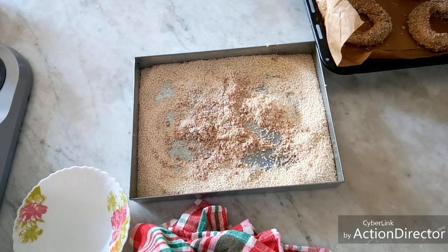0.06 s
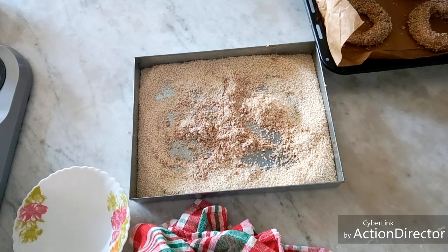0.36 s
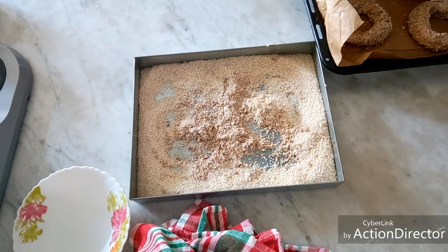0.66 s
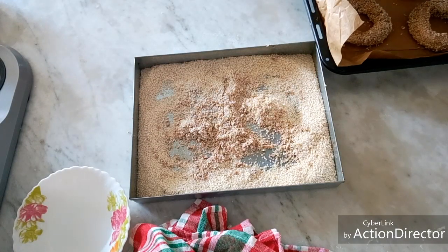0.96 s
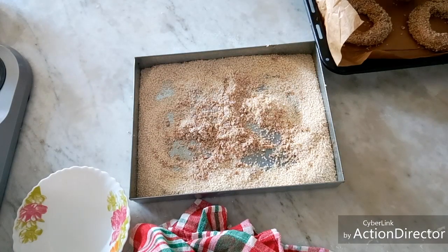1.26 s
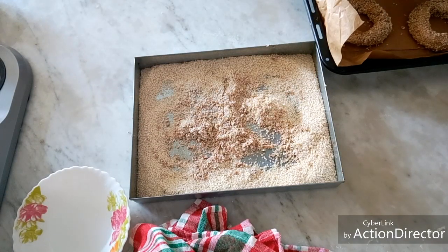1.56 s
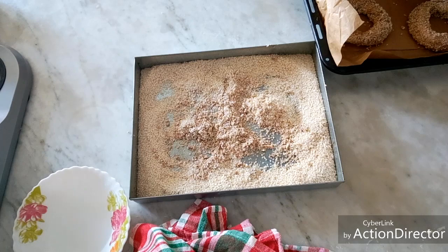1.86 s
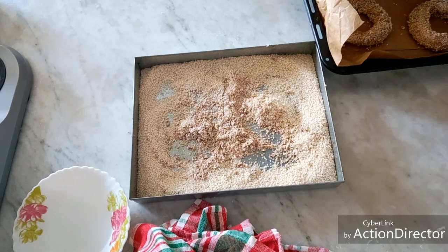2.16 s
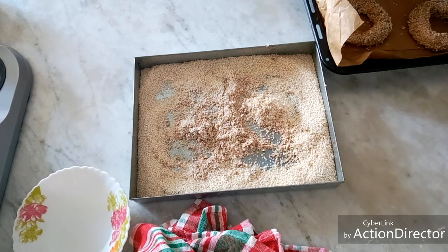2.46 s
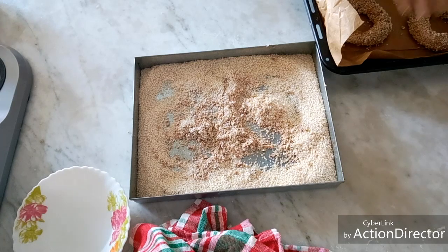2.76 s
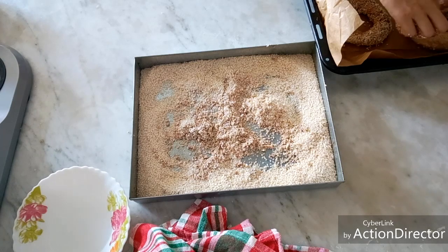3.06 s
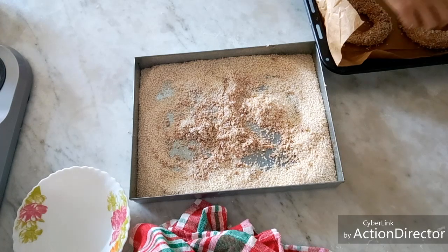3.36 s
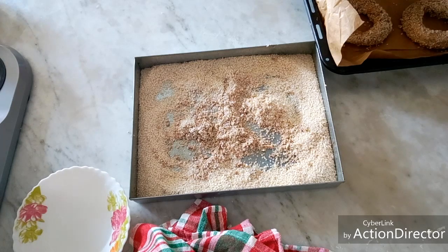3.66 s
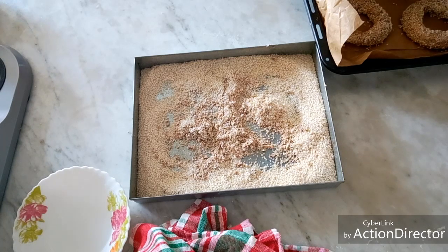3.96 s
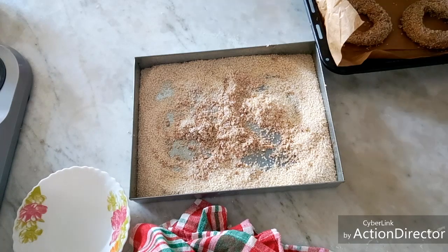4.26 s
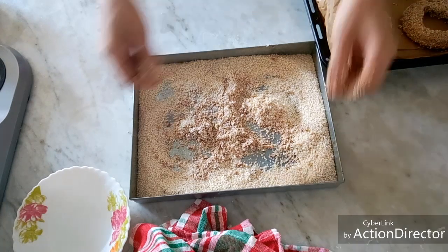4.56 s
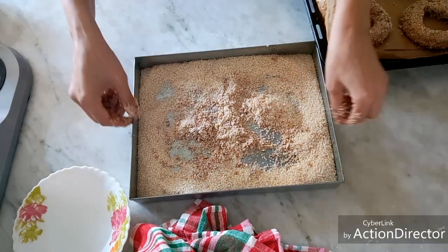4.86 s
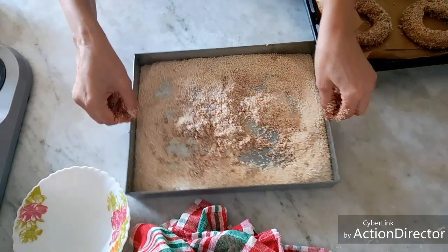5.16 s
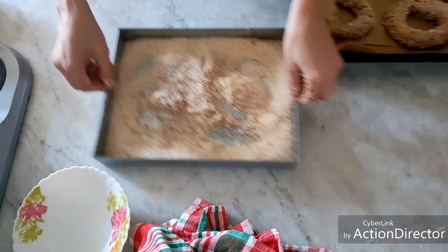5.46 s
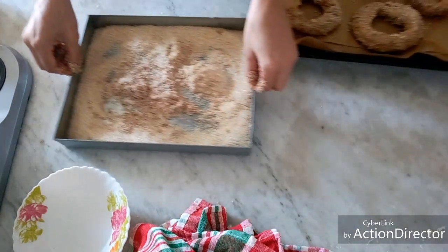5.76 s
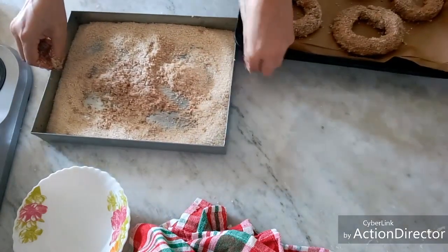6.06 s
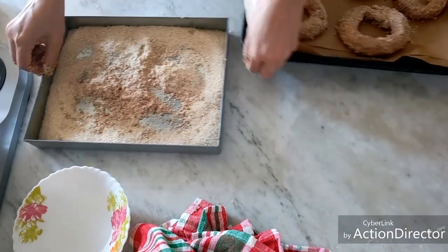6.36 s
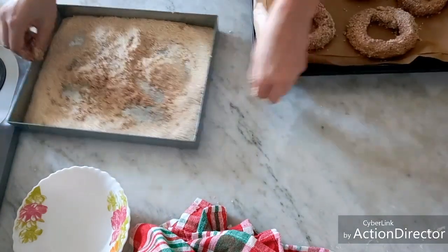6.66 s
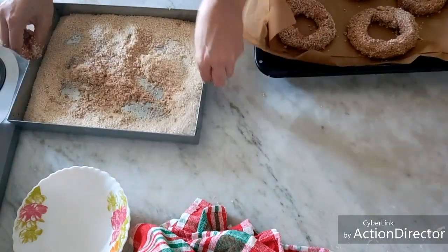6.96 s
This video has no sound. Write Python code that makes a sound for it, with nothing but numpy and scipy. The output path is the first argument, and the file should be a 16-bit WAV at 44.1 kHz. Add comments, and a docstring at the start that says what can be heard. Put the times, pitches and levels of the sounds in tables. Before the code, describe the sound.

Hands rustle baking paper with soft bumps of dough, before a tray of seeds slides grittily and a metal sheet clanks.

```python
"""Baking paper crinkles and snaps as hands settle a seed-coated dough ring on it, with soft rubs and bumps.
Then a metal tray of sesame seeds scrapes across a marble counter, grit ringing its walls. The paper
stirs again, and the baking sheet beside the tray, lightly nudged here and there, knocks down once, loudly.
A small hard kitchen rings after each sound, over room noise and a faint appliance hum."""
import sys
import numpy as np
from scipy import signal
from scipy.fft import rfft, irfft
from scipy.io import wavfile
from scipy.ndimage import uniform_filter1d

SR = 44100
rng = np.random.default_rng(int(sys.argv[2]) if len(sys.argv) > 2 else 0)


def transcribe(u):
    """Save the signal u as a 16-bit wav file named by the first command-line argument.

    u: samples, shape (n,) or (channels, n), limited to [-1, 1]; the rate is SR.
    q: integer samples, one column per channel.
    """
    v = np.clip(np.atleast_2d(u).T, -1, 1)
    q = np.round(v * 32767).astype(np.int16)
    wavfile.write(sys.argv[1], SR, q)


N = 317961
TIME = np.arange(N) / SR

# Tone of the room noise. Each row: frequency in Hz, gain in dB.
ROOM_TONE_EQ = [(20, -9), (45, -5), (80, 9), (190, 0), (300, 0), (600, -6.5), (1200, -10), (2500, -13.5),
                (6000, -16), (9000, -13), (13500, -11.5), (15500, -16.5)]
# The appliance hum. Each row: frequency in Hz, level in dB.
HUM_PARTIALS = [(72, -93.5), (186, -66.5)]
# Soft bumps of hands and dough, and low thumps as the tray starts to slide. Each row: start in seconds, level
# in dB, pitch in Hz, length in seconds.
SOFT_BUMPS = [(0.095, -49, 600, 0.012), (1.275, -48, 145.4, 0.031), (1.895, -58, 219, 0.033),
              (2.025, -54, 330, .025), (3.11, -48, 140, 0.036), (3.506, -51, 350, 0.039),
              (3.675, -49, 199, 0.025), (5.13, -71, 234, .09), (5.265, -50.5, 136.8, .08)]
# Blows on the baking sheet. Each row: start in seconds, level in dB, contact time in ms,
# frequency in Hz below which the sheet is held still.
SHEET_BLOWS = [(1.205, -59, 1.2, 1000), (1.343, -53, 1.2, 1000), (1.384, -55, 1.1, 1000),
               (3.118, -57.5, 0.29, 716), (3.153, -61, 0.92, 910), (5.155, -64, 1, 850),
               (6.32, -49, 0.37, 1110), (6.727, -48.5, 0.36, 1190), (6.8094, -24, 0.12, 130)]
# The baking sheet's modes. Each row: frequency in Hz, gain in dB, free 60 dB decay time in seconds.
SHEET_MODES = [(144, -20, 1), (198, -1, 0.37), (221, -9.5, 0.45), (252, -9.5, 0.43), (298, -17, 0.89),
               (323, -19, 1), (445, -10.5, 0.16), (474.4, -11, 0.21), (524, -17, 0.35), (593.3, -9.5, 0.17),
               (870, -16, 0.13), (1009, -8, 0.23), (1038, -12.5, .17), (1122, -13.5, 0.14),
               (1220, -7, 0.15), (1268, -11, 0.15), (1358, -23, 0.22), (2480, -14, 0.074), (2670, -16, 0.1),
               (3440, -12.5, 0.1), (3673, -4.5, 0.076), (4220, -8, 0.08), (4338, -1, 0.058),
               (4730, -11, 0.084), (4920, -10, 0.13), (6300, -18, 0.13)]
# Envelope of the tray's slide. Each row: time in seconds, scrape level in dB.
SLIDE_ENVELOPE = [(4.75, -85), (4.888, -66.5), (5.35, -64.5), (5.47, -53.5), (5.678, -49.5), (6.022, -48),
                  (6.038, -53.5), (6.092, -48.5), (6.22, -64)]
# Resonances of the tray's walls. Each row: frequency in Hz, width in Hz, gain in dB.
TRAY_MODES = [(1020, 78, 8.5), (1795, 44, -11), (2110, 43, -1), (2250, 50, 0), (2860, 39, -2),
              (3100, 33, -5), (3860, 39, -2), (5170, 81, 0), (6000, 100, 2)]
# Tone of the scrape, and of the counter rumbling under it. Each row: frequency in Hz, gain in dB.
SCRAPE_EQ = [(100, -11), (400, -13), (700, -3), (950, 7), (1500, 3), (2200, 5), (3500, 2), (6300, 3.5),
             (9000, -2), (16000, -5)]
RUMBLE_EQ = [(30, -11), (70, -9.5), (115, 5), (200, -9), (400, -5), (900, -27.5), (4000, -54)]
# Hands press or shift the ring and paper. Each row: start in seconds, swell in seconds,
# time until release in seconds, crinkle level in dB, rub level in dB.
HAND_PRESSES = [(0, 0.0033, 0.072, -50.5, -65), (0.072, .015, 0.2, -46.5, -60),
                (0.402, .015, 0.032, -51, -59.5), (0.496, 0.0072, 0.032, -52, -62),
                (0.631, 0.011, 0.13, -44.5, -62.5), (0.744, 0.027, 0.2, -51.5, -72),
                (1.198, .02, 0.032, -50.5, -64), (1.273, 0.13, 0.16, -43.5, -63),
                (1.518, 0.039, 0.081, -54, -74), (1.813, 0.083, 0.21, -51.5, -57),
                (2.085, .03, .15, -63, -69), (2.264, 0.047, 0.13, -54.5, -66),
                (3.11, 0.092, .17, -55.5, -73), (3.639, 0.034, 0.19, -53.5, -60.5),
                (4.17, 0.053, 0.4, -77, -72.5), (6.2, 0.08, 0.35, -52.5, -60),
                (6.542, 0.025, 0.33, -54.5, -62.5), (6.803, 0.031, 0.3, -47.5, -55.5)]
# Tone of rubbing dough, and of baking paper. Each row: frequency in Hz, gain in dB.
DOUGH_EQ = [(60, -8.5), (130, 8), (300, 4), (600, 2.5), (1200, -2.5), (2500, -6), (8000, -40)]
PAPER_EQ = [(200, -15.5), (800, -13), (1500, -7.5), (2200, -4), (2950, 0), (3900, -2.5), (6000, 0.5),
            (9000, -5), (16000, -11.5)]
# The loudest creases snapping. Each row: start in seconds, level in dB, centre in Hz,
# crispness above 10 kHz in dB, decay in ms.
LOUD_CREASES = [(.0181, -42.5, 6200, -2, 1.7), (.0939, -44.5, 2840, -6, 5.6), (.183, -44, 2970, -9, 1.2),
                (.2227, -38, 4000, -8, 2.6), (.3581, -47.5, 3060, -6, 2.1), (.4156, -44.5, 2900, -1, 2.1),
                (.5129, -39, 3020, -7, 2), (.527, -43, 4750, -3, 2), (.652, -36.5, 5800, -4, 4.2),
                (.698, -38.5, 6100, 0, 0.71), (.708, -37.5, 5500, -6, 11), (1.0922, -46.5, 2880, -22, 2.2),
                (1.2017, -41.5, 4890, 2.5, 4), (1.3087, -44.5, 2540, -17, 3.2),
                (1.346, -33.5, 4910, -4.5, 1.2), (1.409, -36, 3300, -5, 3.2), (1.6251, -45, 5640, -5, 2.5),
                (1.8706, -44, 2800, -6, 2.3), (1.9467, -33.5, 3000, -4.5, 2.3),
                (1.974, -42.5, 3050, 2, 1.8), (2.1565, -51.5, 2910, -8, 2.3),
                (2.2617, -50, 4800, -0.5, 1.5), (2.3284, -50.5, 2840, -9, 1.7),
                (2.4036, -50, 5900, -6, 1.8), (3.6422, -43, 4800, 5.5, 2.5), (3.6913, -45.5, 5800, 2, 4.2),
                (3.7523, -42, 3340, -6, 4.7), (3.8146, -44, 3470, 4, 1.4), (3.8453, -39, 5470, 2, 5.8),
                (4.1833, -51.5, 4140, 6, 2.6), (4.338, -50, 3250, -8, 1.9), (6.3248, -44, 5340, -1, 2.5),
                (6.3582, -37, 3800, -11, 11), (6.4269, -30.5, 4610, 3.5, 4.5),
                (6.4744, -36.5, 4000, 2, 2.2), (6.7265, -39.5, 2650, -8, 2.7),
                (6.974, -35.5, 5600, -3.5, 4.4), (7.1223, -33.5, 3640, -7, 0.8),
                (7.133, -35, 5320, -4, 2.3), (7.1394, -40, 6100, -1, 0.88)]
# The microphone's response. Each row: frequency in Hz, gain in dB.
MIC_EQ = [(20, 0), (6400, 0.5), (7200, -7), (8200, -15.5), (10000, -16.5), (13900, -19), (15000, -0.5),
          (15600, -13.5)]


def undb(db):
    """Decibels to gain."""
    return 10 ** (np.asarray(db) / 20)


def unit(x):
    """Scale to rms 1."""
    return x / np.sqrt(np.mean(x ** 2))


def add(track, start_s, sound):
    """Mix a sound into the track at its cue."""
    start = max(int(start_s * SR), 0)
    track[start:start + len(sound)] += sound[:N - start]


def equalise(x, points, size=4096):
    """Minimum-phase EQ through the given (Hz, dB) points."""
    hz, db = np.transpose(points)
    grid = np.maximum(np.fft.rfftfreq(size, 1 / SR), 1)
    response = undb(np.interp(np.log(grid), np.log(hz), db))
    cepstrum = irfft(np.log(response))
    cepstrum[1:size // 2] *= 2
    cepstrum[size // 2 + 1:] = 0
    return signal.fftconvolve(x, irfft(np.exp(rfft(cepstrum))))[:len(x)]


def resonate(x, hz, width_hz):
    """One resonance, gain 1 at its centre."""
    return signal.lfilter(*signal.iirpeak(hz, min(width_hz, SR / 4), fs=SR), x)


def highpass(x, hz, order=2):
    """Roll off the lows."""
    return signal.sosfilt(signal.butter(order, hz, "high", fs=SR, output="sos"), x)


def decay(t, t60):
    """A fade that falls 60 dB in t60 seconds."""
    return np.exp(-np.log(1000) * t / t60)


def wander(rate_hz):
    """A smooth random modulator at rms 1."""
    step = int(SR / rate_hz)
    held = np.repeat(rng.standard_normal(N // step + 1), step)
    return unit(uniform_filter1d(held, step)[:N])


def grains(per_second, spread_db):
    """Tiny random impulses of uneven size, at rms 1."""
    size = undb(spread_db * np.minimum(rng.exponential(size=N), 4))
    return unit((rng.random(N) < per_second / SR) * size * rng.standard_normal(N))


def background(air_db=-62, waver_db=1):
    """The bed: steady room noise and a wavering appliance hum."""
    air = unit(equalise(rng.standard_normal(N), ROOM_TONE_EQ))
    hum = sum(undb(db + waver_db * wander(4.32)) * np.sin(2 * np.pi * hz * TIME + 0.24 * wander(5.6))
              for hz, db in HUM_PARTIALS)
    return undb(air_db) * air + hum


def kitchen_reverb(x, low_t60=0.78, high_t60=0.55, split_hz=2500, build_s=0.00047):
    """Hard kitchen walls return a dense tail, a little shorter in the treble."""
    t = np.arange(SR * 3 // 5) / SR
    noise = rng.standard_normal(len(t))
    treble = highpass(noise, split_hz, order=1)
    tail = (noise - treble) * decay(t, low_t60) + treble * decay(t, high_t60)
    tail *= 1 - np.exp(-t / build_s)
    return signal.fftconvolve(x, tail / np.linalg.norm(tail))[:N]


def soft_bumps(width_hz=170, scuff_db=2.0, tone_db=-11):
    """Hands and dough land softly, and the tray thumps as it starts to slide: one dull tone swells and fades,
    with scuffing around it."""
    out, t = np.zeros(N), np.arange(SR // 2) / SR
    for start, db, hz, length in SOFT_BUMPS:
        noise = rng.standard_normal(len(t))
        scuff = undb(scuff_db) * unit(resonate(resonate(noise, hz, width_hz), hz, width_hz))
        tone = undb(tone_db) * np.sin(2 * np.pi * hz * t)
        age = 2 * t / length
        add(out, start, undb(db) * (tone + scuff) * age * np.exp(1 - age))
    return out


def sheet_knocks(crack_db=2, crack_s=0.0082, crack_hz=300, settled_db=-11, settle_s=0.037):
    """The baking sheet rings, and is soon damped as its rim settles on the counter."""
    out, t = np.zeros(N), np.arange(SR // 2) / SR
    modes = sum(undb(db) * decay(t, t60) * np.sin(2 * np.pi * hz * t) for hz, db, t60 in SHEET_MODES)
    modes *= np.exp(-t / settle_s) + undb(settled_db)
    landing = 1 - np.exp(-t / .0014)  # the rim lands over a few milliseconds
    for start, db, contact_ms, held_hz in SHEET_BLOWS:
        crack = undb(crack_db) * np.exp(-t / crack_s) * highpass(rng.standard_normal(len(t)), crack_hz)
        # a longer contact pushes more gently and leaves out the high modes
        push = t * np.exp(-4 * t / (contact_ms / 1000))
        ring = signal.fftconvolve((modes + crack) * landing, push)[:len(t)]
        ring = highpass(ring, held_hz, order=4)
        add(out, start, undb(db) * ring / np.std(ring[:SR // 40]))
    return out


def tray_slide(scrape_db=0.5, judder_db=0.6, rumble_db=-37):
    """Grit catches between tray and marble and rings the tray's walls; the counter rumbles under it."""
    times, levels_db = np.transpose(SLIDE_ENVELOPE)
    speed = undb(np.interp(TIME, times, levels_db, left=-120, right=-120))
    friction = grains(12000, spread_db=1.1) * undb(judder_db * wander(45)) * speed
    walls = sum(undb(db) * resonate(friction, hz, width) for hz, width, db in TRAY_MODES)
    rumble = undb(rumble_db) * np.sqrt(speed) * unit(equalise(rng.standard_normal(N), RUMBLE_EQ))
    return undb(scrape_db) * (equalise(friction, SCRAPE_EQ) + walls) + rumble


def pressure(start, swell, length, release_s):
    """A hand's push: it swells, holds and dies away."""
    age = np.maximum(TIME - start, 0)
    return np.minimum(age / swell, 1) * np.exp(-np.maximum(age - length, 0) / release_s)


def handling(crinkle_release_s=0.057, rub_release_s=0.056, relax_s=0.16, relax_db=-9.5):
    """Envelopes for the paper's crinkle and the rub of dough or hand; the strongest push leads."""
    crinkle, rub = np.zeros((2, N))
    for *timing, crinkle_db, rub_db in HAND_PRESSES:
        pressed = pressure(*timing, crinkle_release_s)
        # once the hand lets go the rub stops quickly, while the paper relaxes with faint crinkles
        relaxing = undb(relax_db) * pressure(*timing, relax_s)
        crinkle = np.maximum(crinkle, undb(crinkle_db) * np.maximum(pressed, relaxing))
        rub = np.maximum(rub, undb(rub_db) * pressure(*timing, rub_release_s))
    return crinkle, rub


def rustle(crinkle, rub, crinkle_db=4.0, rub_db=2, flurry_db=1.83):
    """Countless small creases and seeds tick on the paper in flurries; the dough rubs lower down."""
    ticks = equalise(grains(7000, spread_db=-1.0) * undb(flurry_db * wander(90)), PAPER_EQ)
    drag = unit(equalise(grains(2500, spread_db=1.15) * undb(1.5 * wander(40)), DOUGH_EQ))
    return undb(crinkle_db) * crinkle * ticks + undb(rub_db) * rub * drag


def small_creases(crinkle, count=60, over_db=1.0, spread_db=6, centre_hz=4200, octaves=0.77,
                  crisp_db=-5, decay_ms=1.9):
    """Lesser creases give way at random, as loud as the paper is worked: rows like LOUD_CREASES."""
    rows = []
    for when, size, patch in rng.random((count, 3)):
        worked_db = 20 * np.log10(crinkle[int(when * N)] + 1e-9)
        db = worked_db + over_db + spread_db * (size - .5)
        hz = centre_hz * 2 ** (octaves * (patch - .5))
        rows.append((when * N / SR, db, hz, crisp_db, decay_ms))
    return rows


def paper_tone(burst, crisp_db):
    """Voice a burst as baking paper, with a treble shelf; its first 5 ms have rms 1 through the mic."""
    shelf = [(7000, 0), (10000, min(crisp_db, 12))]
    voiced = equalise(equalise(burst, PAPER_EQ, size=512), shelf, size=512)
    return voiced / np.std(equalise(voiced, MIC_EQ, size=512)[:SR // 200])


def paper_snaps(creases, rise_s=0.00044, flutter_s=0.013, flutter_db=-21,
                broad_db=-11, width_hz=900, wet_db=-3.0):
    """Each crease buckles in milliseconds and rings its own patch, with its own path to the walls."""
    out, t = np.zeros(N), np.arange(SR // 16) / SR
    attack = 1 - np.exp(-t / rise_s)
    flutter = undb(flutter_db) * np.exp(-t / flutter_s)
    for start, db, hz, crisp_db, decay_ms in creases:
        envelope = attack * (np.exp(-t / (decay_ms / 1000)) + flutter)
        # the patch faces the microphone; the rest of the paper radiates more evenly into the room
        near, around = envelope * rng.standard_normal((2, len(t)))
        near = resonate(near, hz, width_hz) + undb(broad_db) * highpass(near, hz=900, order=1)
        around = resonate(around, hz, 2 * width_hz) + .5 * around
        add(out, start, undb(db) * paper_tone(near, crisp_db))
        add(out, start, undb(db + wet_db) * kitchen_reverb(paper_tone(around, crisp_db)))
    return out


def scene(wet_db=-8, dry_below_hz=280):
    """Paper, trays and hands in the kitchen; the counter's low thuds stay close and dry."""
    crinkle, rub = handling()
    paper = paper_snaps(LOUD_CREASES) + paper_snaps(small_creases(crinkle)) + rustle(crinkle, rub)
    counter = tray_slide() + sheet_knocks() + soft_bumps()
    reverb = undb(wet_db) * kitchen_reverb(highpass(counter, dry_below_hz))
    return (paper + counter + reverb + background())[None]


def record(dry, top_hz=15800):
    """The microphone dulls the treble above 7 kHz, peaks near 15 kHz and cuts the top."""
    high_cut = signal.ellip(10, .2, 70, top_hz, fs=SR, output="sos")
    return signal.sosfilt(high_cut, equalise(dry[0], MIC_EQ))[None]


dry = scene()
out = record(dry)
transcribe(out)
```